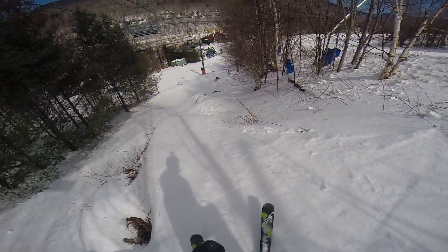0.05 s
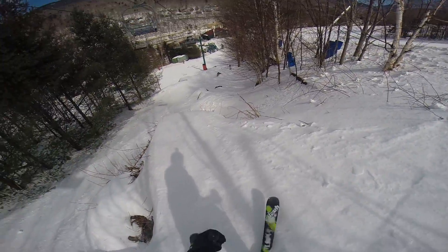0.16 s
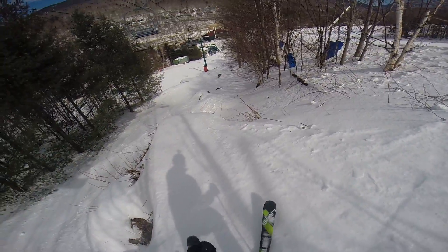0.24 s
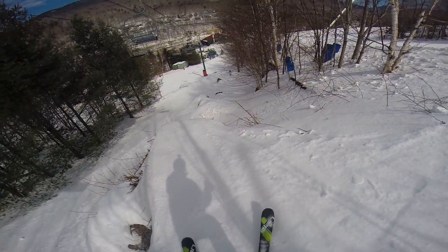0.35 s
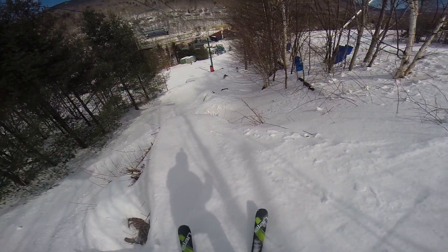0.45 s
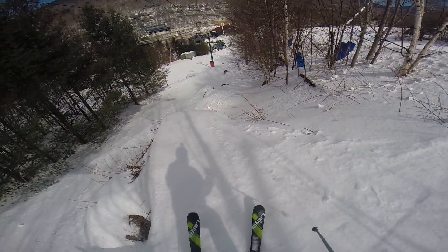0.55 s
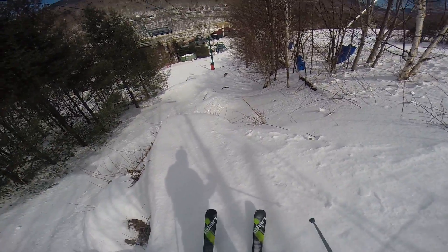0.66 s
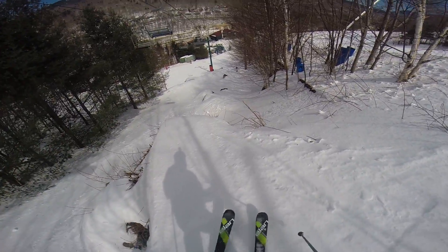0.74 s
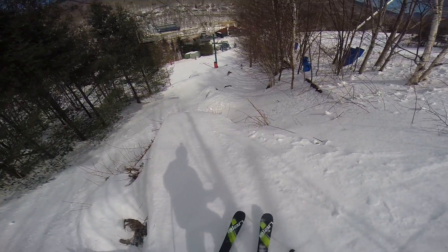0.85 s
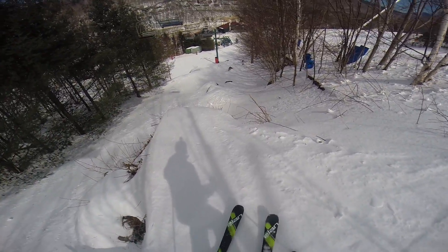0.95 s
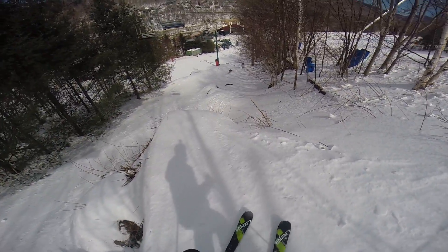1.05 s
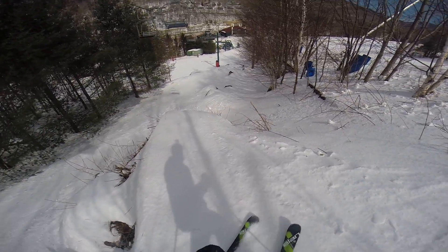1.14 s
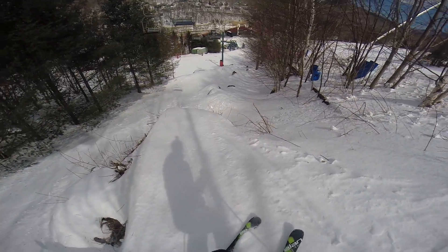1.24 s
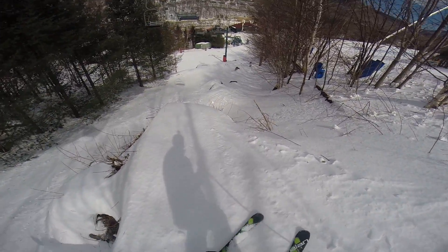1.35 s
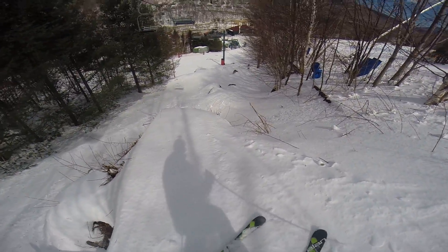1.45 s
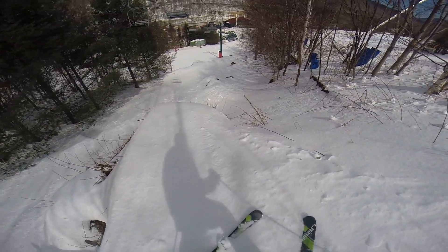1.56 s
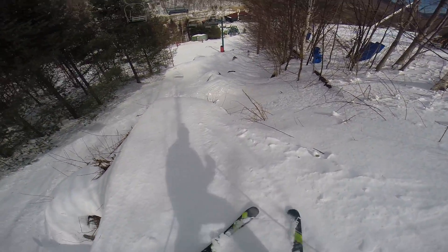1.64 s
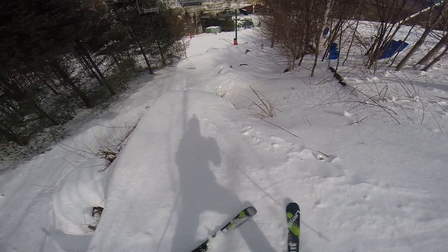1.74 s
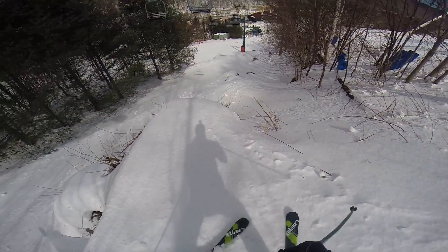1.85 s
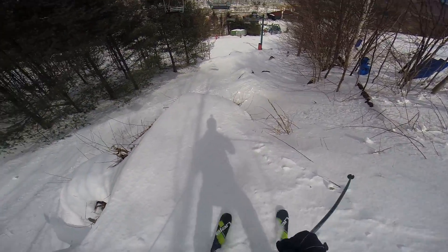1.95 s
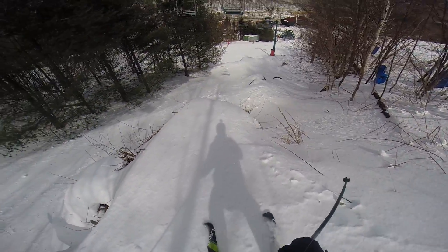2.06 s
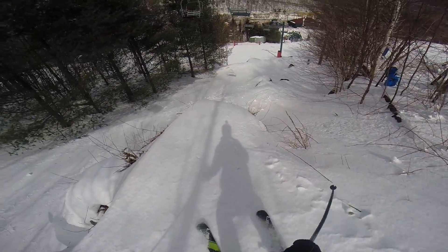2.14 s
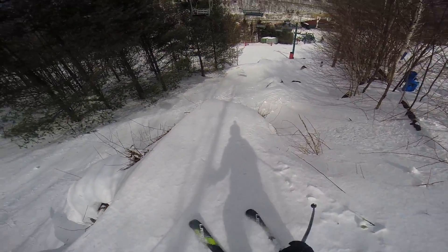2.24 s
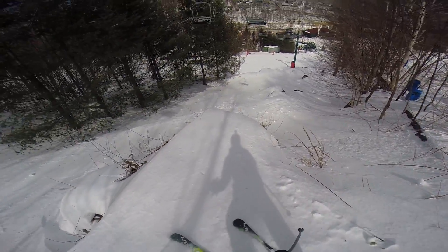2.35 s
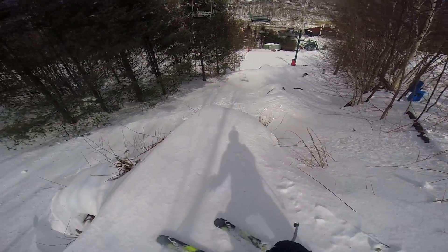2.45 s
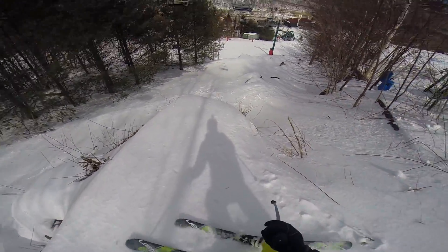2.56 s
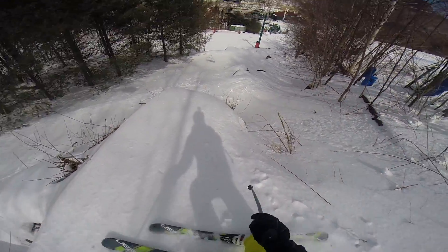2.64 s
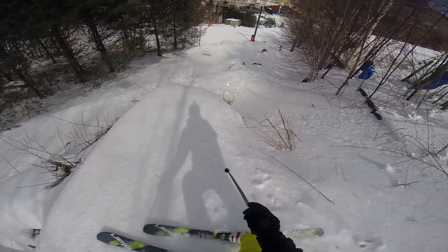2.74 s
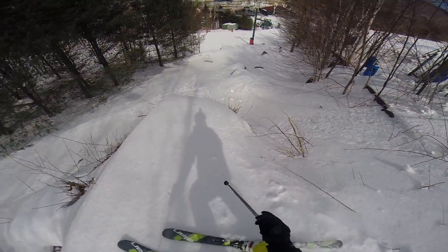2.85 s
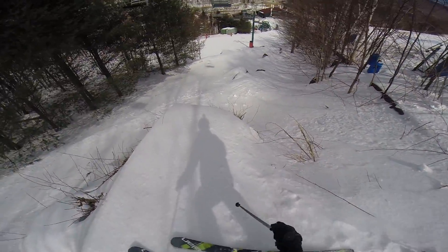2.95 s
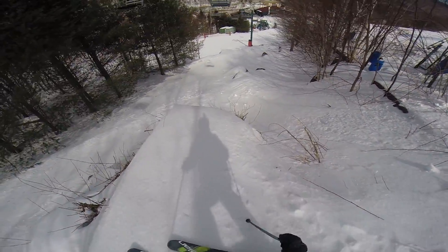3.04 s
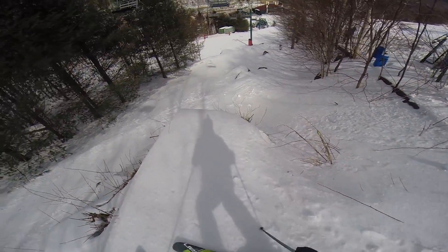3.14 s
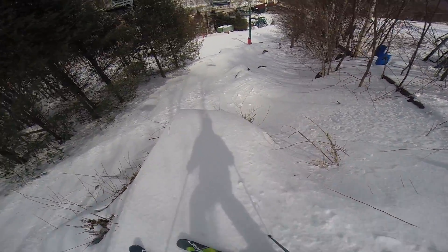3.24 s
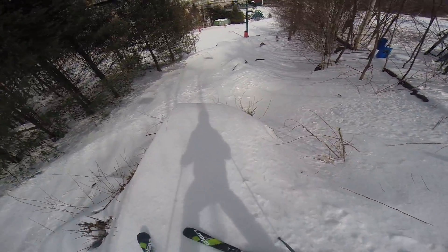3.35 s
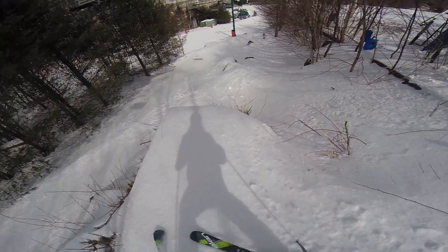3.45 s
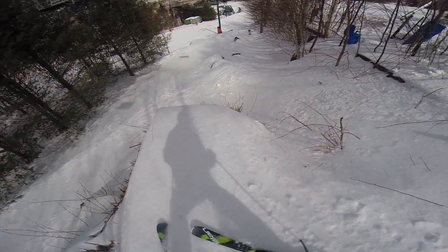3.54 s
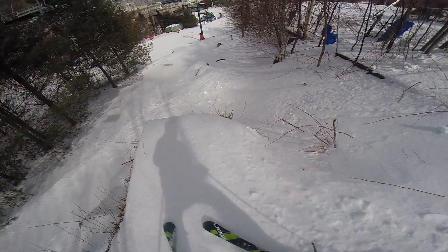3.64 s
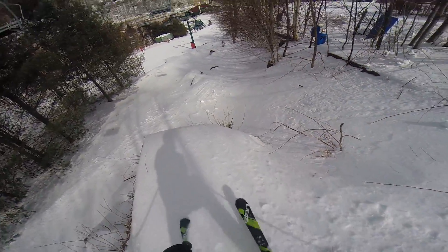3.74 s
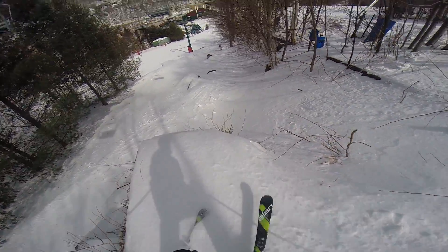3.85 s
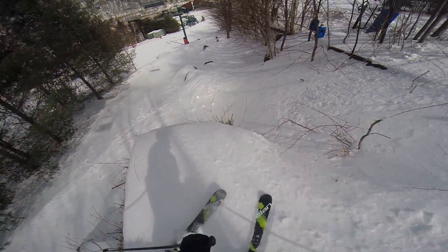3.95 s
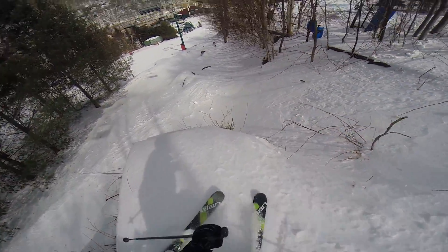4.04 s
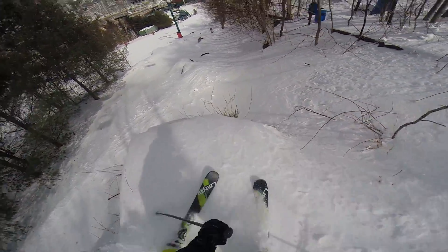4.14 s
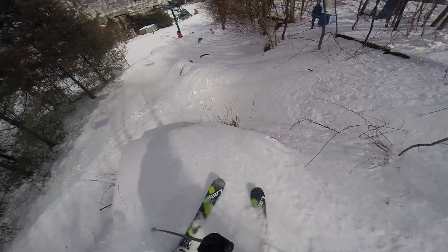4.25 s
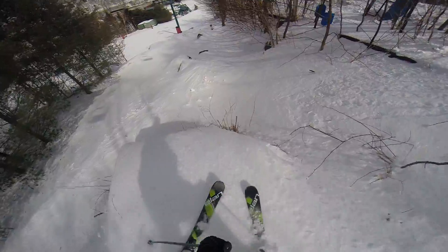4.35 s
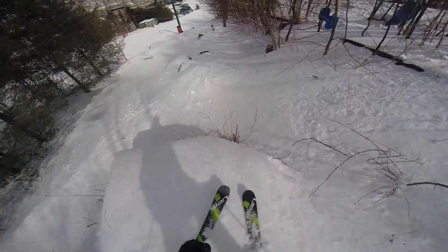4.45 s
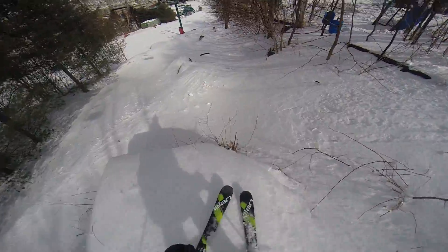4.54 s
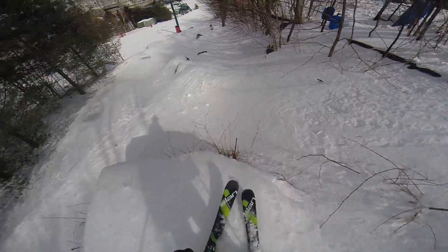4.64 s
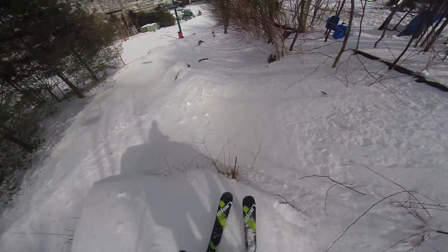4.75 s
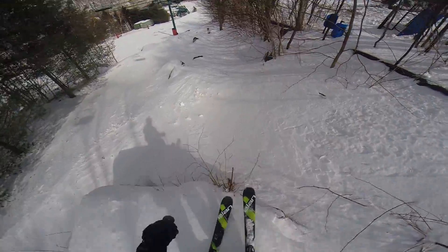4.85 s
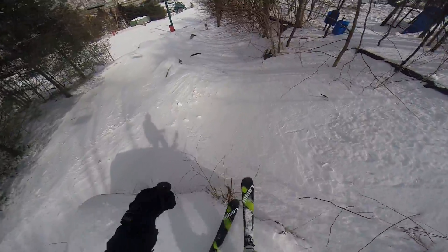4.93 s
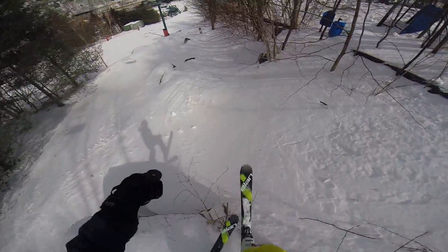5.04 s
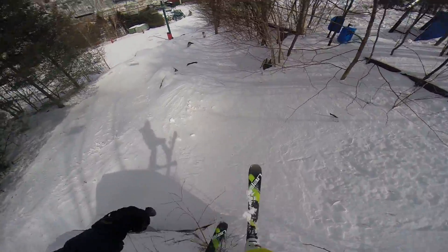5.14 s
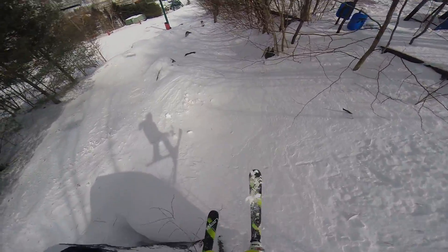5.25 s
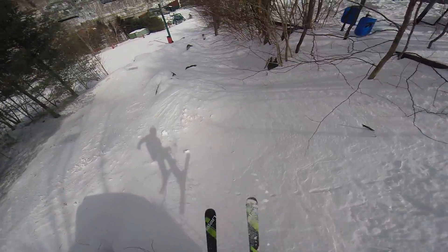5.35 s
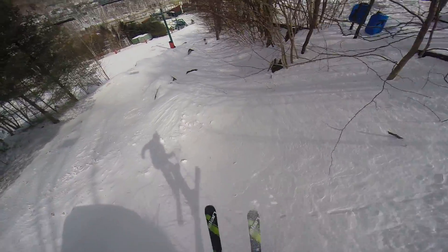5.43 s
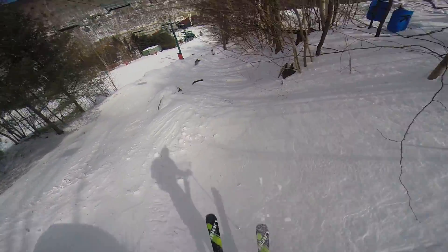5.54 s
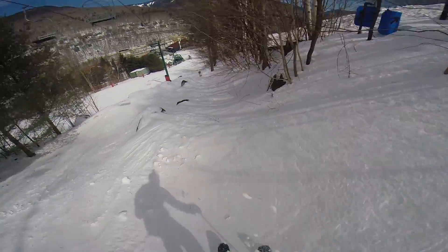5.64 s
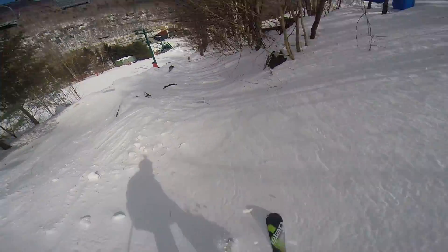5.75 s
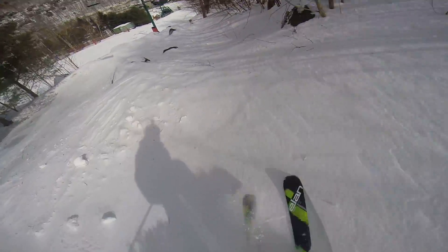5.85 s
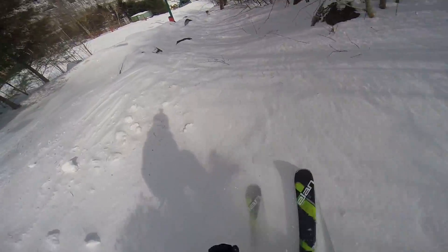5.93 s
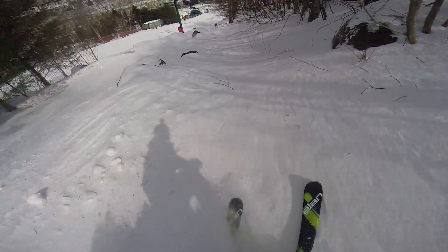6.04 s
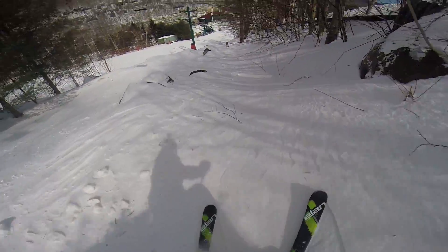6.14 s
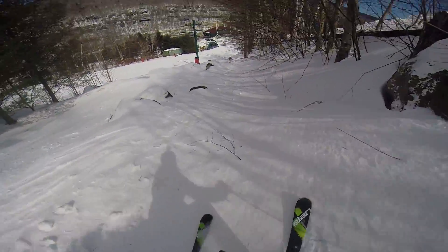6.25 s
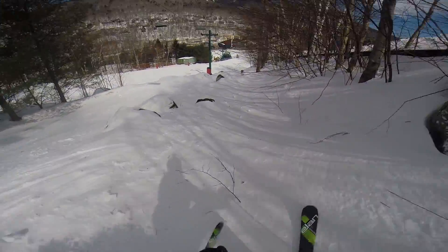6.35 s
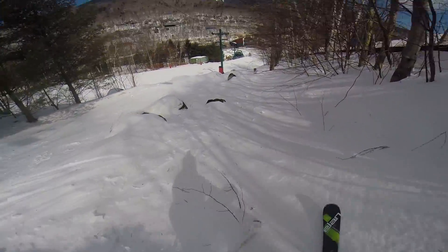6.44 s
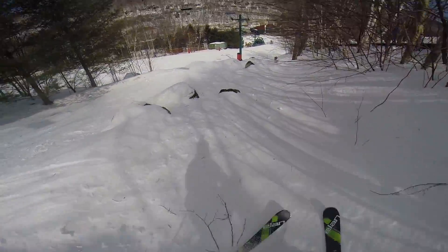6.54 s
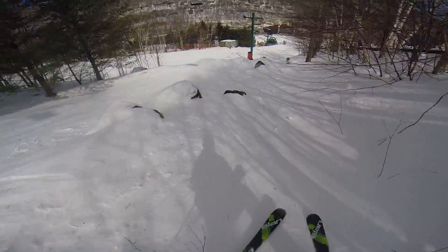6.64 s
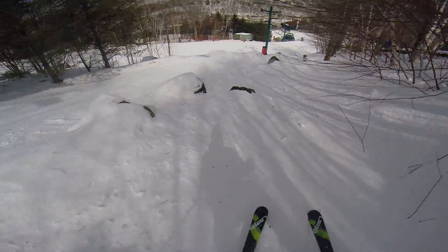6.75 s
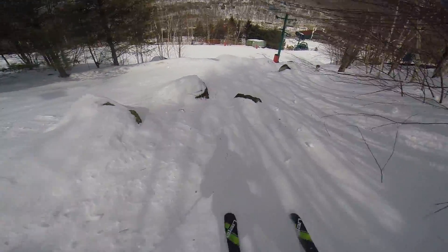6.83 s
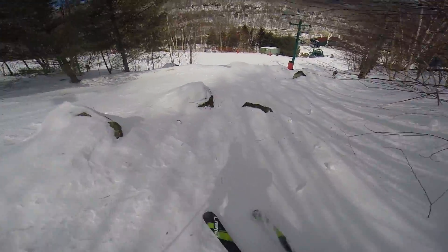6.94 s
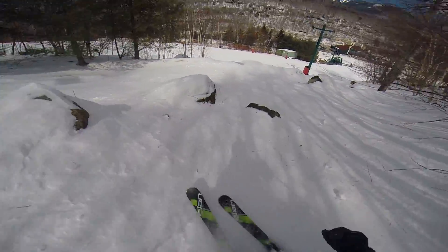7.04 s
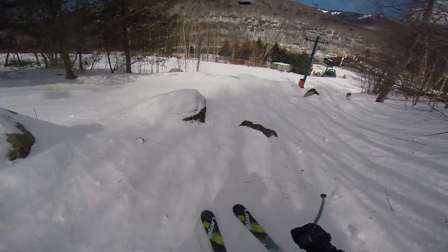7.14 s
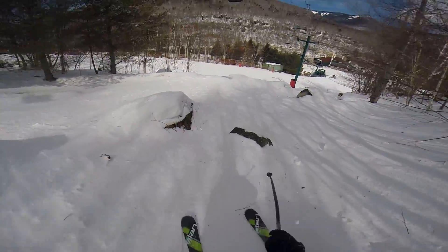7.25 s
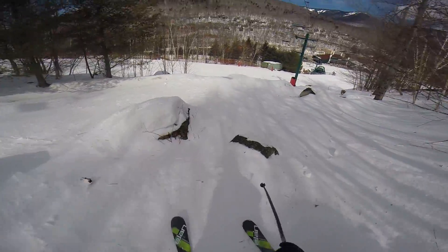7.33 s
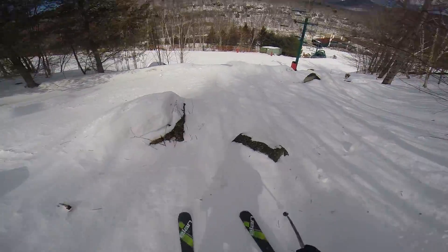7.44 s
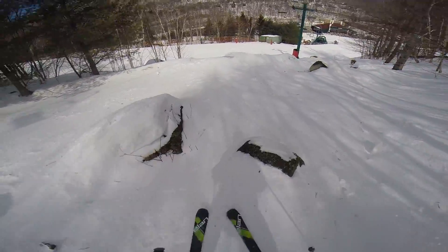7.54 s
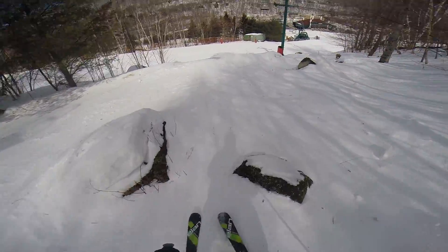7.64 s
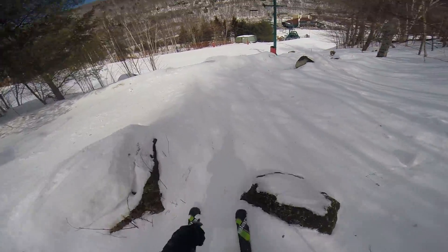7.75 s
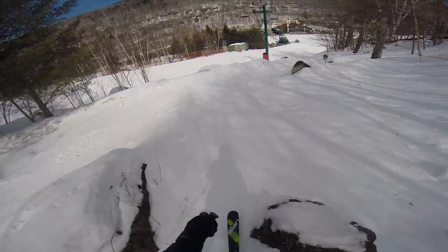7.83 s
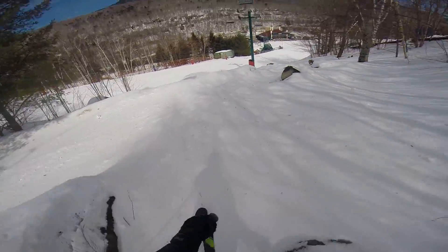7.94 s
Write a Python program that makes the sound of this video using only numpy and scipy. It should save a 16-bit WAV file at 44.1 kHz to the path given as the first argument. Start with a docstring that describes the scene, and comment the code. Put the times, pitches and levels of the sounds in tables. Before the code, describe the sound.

Skis hiss and scrape over bumpy snow while a helmet camera's case knocks with each jolt, over low wind rumble.

```python
"""A closed camera case knocks on its helmet mount as a skier rides down a bumpy slope.
Each jolt rings the mount (thump) and the case wall (click). Snow grains hiss under the skis, heard
through the case's resonances. Clothing or gear rustle, hiss and icy spray swell in sudden surges.
Twigs, poles and bindings tick. Gusts rumble on the case over faint microphone noise."""
import sys
import numpy as np
from scipy import signal
from scipy.io import wavfile
from scipy.ndimage import uniform_filter1d

SR = 44100
rng = np.random.default_rng(int(sys.argv[2]) if len(sys.argv) > 2 else 0)


def dump_mix(stems):
    """Bounce the given channels to the path in sys.argv[1] as a 16-bit WAV at rate SR."""
    frames = np.atleast_2d(stems).T  # one column per channel
    limited = np.clip(frames, -1, 1)  # hard clip at full scale
    pcm = np.round(limited * 32767).astype(np.int16)
    wavfile.write(sys.argv[1], SR, pcm)


N = 352359

# sliding between surges: (time [s], hiss [dB], scrape [dB])
SLIDE_LEVELS = [(0.0, -58.5, -59.5), (0.62, -64, -65), (0.9, -53, -69), (1.2, -52, -55.5),
                (1.75, -50.5, -49), (2.0, -47.5, -61.5), (2.34, -44, -42.5), (2.58, -36, -50),
                (2.96, -46.5, -65), (3.3, -44.5, -64), (3.58, -42.5, -43.5), (3.92, -42.5, -54),
                (4.1, -40, -46), (4.55, -50, -53), (5.08, -50, -58), (5.3, -61, -59), (5.55, -59, -46),
                (5.9, -47.5, -36.5), (6.25, -50.5, -50), (6.45, -40, -41), (6.86, -51, -50),
                (7.08, -37, -36), (7.33, -48, -51.5), (7.99, -50, -52.5)]
# ride: (time [s], wind [dB], mount shake [dB])
RIDE_LEVELS = [(0.0, -41.5, -93.5), (0.85, -43, -86.5), (1.45, -42.5, -82), (1.78, -38.5, -73.5),
               (2.1, -41.5, -96), (2.4, -39.5, -75), (3.14, -42.5, -84), (3.55, -39, -74),
               (4.22, -34.5, -70.5), (4.42, -45.5, -84), (4.7, -41, -72.5), (5.12, -35.5, -92.5),
               (5.4, -33.5, -69), (5.76, -28, -59), (6.65, -37.5, -76.5), (7.19, -29.5, -69),
               (7.48, -41.5, -74.5), (7.99, -36.5, -71)]
# sudden swells: (start [s], end [s], clothing or gear rustle [dB], snow hiss [dB], icy spray [dB])
SURGES = [(0.092, 0.149, -58, -52, -78), (0.305, 0.413, -66, -46.5, -68), (0.422, 0.602, -45.5, -62, -81),
          (1.151, 1.249, -52, -45.5, -67), (2.546, 2.628, -44, -36.5, -68), (4.037, 4.282, -64, -41, -59.5),
          (4.72, 4.766, -47, -48, -70), (5.246, 5.255, -58.5, -52, -45.5), (5.394, 5.469, -50, -56, -72),
          (5.478, 5.619, -34, -46, -60.5), (5.686, 5.734, -35.5, -45.5, -56), (5.763, 5.812, -34, -55, -61),
          (5.885, 6.178, -37.5, -61, -66), (6.293, 6.399, -46.5, -40, -57),
          (6.438, 6.476, -40, -34.5, -48.5), (6.489, 6.575, -35, -38, -48), (6.946, 7.233, -44, -43, -62.5),
          (7.372, 7.502, -44, -47.5, -63.5), (7.67, 7.714, -33.5, -31.5, -62),
          (7.848, 7.912, -46, -32, -53)]
# twig, pole and binding snaps: (time [s], gear drive [dB], case drive [dB])
SNAPS = [(0.2303, -36, -26), (0.3486, -39, -44.5), (0.9062, -40, -39.5), (1.4154, -42, -47),
         (1.622, -33, -34), (1.6557, -35.5, -33.5), (1.925, -37.5, -32.5), (1.956, -41, -37),
         (2.115, -38, -34.5), (2.2235, -39.5, -36), (2.394, -39, -27.5), (3.1372, -38.5, -32.5),
         (3.906, -40, -31.5), (3.975, -48, -37), (4.233, -34, -49), (4.418, -44, -29.5),
         (4.535, -40.5, -37.5), (4.689, -48, -33.5), (4.89, -40.5, -42), (5.1609, -41, -37),
         (5.2458, -34, -28.5), (5.2524, -58, -58), (5.2734, -46.5, -47), (5.6867, -34, -27.5),
         (5.7724, -30.5, -24), (5.895, -37, -32.5), (6.2893, -33.5, -33.5), (6.3597, -32, -28),
         (6.6093, -34.5, -44.5), (6.9456, -36.5, -43), (6.9815, -32.5, -31), (7.0352, -29.5, -23),
         (7.1167, -35.5, -25), (7.5801, -33, -30.5), (7.6241, -35.5, -33), (7.6515, -30.5, -23),
         (7.676, -48.5, -24), (7.8414, -34, -40), (7.8923, -27.5, -17)]
# case knocks: (time [s], thump drive [dB], click drive [dB])
CASE_KNOCKS = [(0.881, -43.5, -47), (1.063, -24.5, -36.5), (1.348, -57, -43), (1.366, -41, -54),
               (1.518, -47.5, -49), (1.725, -9.5, -10.5), (1.818, -19.5, -30.5), (1.898, -39, -55),
               (2.27, -11, -15), (2.334, -12.5, -20), (2.675, -6.5, -9.5), (2.991, -33.5, -57),
               (3.398, -21.5, -30.5), (3.741, -13, -18.5), (4.036, -8, -11.5), (4.206, -8.5, -10),
               (4.366, -18.5, -23), (4.672, -13, -16.5), (5.155, -22, -42), (5.169, -13, -38),
               (5.287, -6.5, -8), (5.402, -35, -40), (5.481, -18, -28), (5.517, -26, -21.5),
               (5.541, -13, -18.5), (5.596, -21.5, -30.5), (5.714, -28.5, -45.5), (5.745, -29, -35),
               (5.784, -18, -27), (5.819, -4, -7), (5.91, -39, -29.5), (6.0, -33.5, -36), (6.103, -29, -31),
               (6.152, -32.5, -38), (6.181, -28.5, -33.5), (6.283, -32, -50.5), (6.735, -32, -33.5),
               (6.785, -4.5, -9.5), (7.08, -14, -18.5), (7.2, -24, -36), (7.274, -6.5, -9.5),
               (7.291, -28, -23.5), (7.684, -7, -15), (7.855, -8.5, -13)]
# air paths through the case: (centre [Hz], width [Hz], gain [dB])
CASE_BANDS = [(1700, 208, 1.5), (2590.4, 264, 0.5), (3865, 270, -8), (4544, 730, -4.5), (6085, 350, -22)]
# fine spray: (centre [Hz], width [Hz], gain [dB])
SPRAY_BANDS = [(8230, 1540, 8.5), (8800, 14750, -0.5), (10300, 1040, -2), (12900, 420, -5)]
# icy spray: (centre [Hz], width [Hz], gain [dB])
ICE_BANDS = [(7500, 4400, 2.5), (10100, 1300, 2.5), (13600, 610, -4)]
# scraping clothing or gear: (centre [Hz], width [Hz], gain [dB])
SCRAPE_BANDS = [(804, 483, -16), (1902, 243, 4.5), (2206.6, 289, 5), (2498, 462, 0.5), (3650, 280, -14.5),
                (5400, 220, -21), (6200, 310, -18), (7620, 300, -24)]
# mount and helmet: (frequency [Hz], gain [dB], t60 [s])
MOUNT_MODES = [(53.3, 6.5, 0.012), (140.5, 2.5, 0.1), (252.06, -26, 0.31), (399, -2.5, 0.01457),
               (721, -12.5, 0.04), (954, -14.5, 0.0758)]
# case wall: (frequency [Hz], gain [dB], t60 [s])
WALL_MODES = [(1465, -1.5, 0.0137), (1786, 8.5, 0.016), (2176, 4.5, 0.0213), (2572, 6.5, 0.0173),
              (2914, 0, 0.025)]
# tapped ski or pole: (frequency [Hz], gain [dB], t60 [s])
GEAR_MODES = [(3826, -17, 0.0081), (4582, -20, 0.027), (5620, -23, 0.0143), (7380, -17, 0.0016),
              (10550, -25.5, 0.0025), (13300, -34.5, .004)]
# case under a light tap: (frequency [Hz], gain [dB], t60 [s])
CASE_TAP_MODES = [(1726, -18, 0.023), (2200, -23, 0.015), (2628, -18.5, 0.0297)]

SPRAY_DB, BUFFET_DB, RATTLE_DB = -16.5, -16, -6  # re hiss, rumble, click drive
SURGE_EASE_DB, SURGE_RAMP_S = -2, 0.005
THUMP_LAG_S, CLICK_LAG_S = 0.00072, 0.000984  # after first touch
FLOOR_DB, TOP_HZ = -62, 15200


def undb(db):
    return 10 ** (np.asarray(db) / 20)


def unit_rms(x):
    return x / np.sqrt(np.mean(x ** 2))


def butter(x, order, hz, kind="low"):
    return signal.sosfilt(signal.butter(order, hz, kind, fs=SR, output="sos"), x)


def curves(table):
    times_s, *columns = np.transpose(table)
    return [np.interp(np.arange(N) / SR, times_s, column) for column in columns]


def ring(x, hz, t60_s):
    """One mode: an impulse starts a decaying sine."""
    r = np.exp(-np.log(1000) / (t60_s * SR))
    w = 2 * np.pi * hz / SR
    return signal.lfilter([0, r * np.sin(w)], [1, -2 * r * np.cos(w), r * r], x)


def modes(x, table):
    """Mode bank, neighbours in opposite phase."""
    return sum((-1) ** k * undb(db) * ring(x, hz, t60_s) for k, (hz, db, t60_s) in enumerate(table))


def resonate(x, bands):
    """Steep resonances in parallel."""
    out = 0
    for hz, width_hz, db in bands:
        b, a = signal.iirpeak(hz, hz / (1.48 * width_hz), SR)
        out = out + undb(db) * signal.lfilter(b, a, signal.lfilter(b, a, x))
    return out


def wander(rate_hz):
    """Random steps, smoothed twice; spread near 1."""
    hold = int(SR / rate_hz)
    steps = np.repeat(rng.standard_normal(N // hold + 1), hold)
    return 1.64 * uniform_filter1d(uniform_filter1d(steps, hold), hold)[:N]


def grit(rate_hz, spread_db):
    """Scattered clicks, most small, a few large."""
    size = undb(spread_db * rng.exponential(size=N)) * rng.standard_normal(N)
    return unit_rms(size * (rng.random(N) < rate_hz / SR))


def flicker(bands, depth_db):
    """Separate grains and level drift per band."""
    return unit_rms(sum(resonate(grit(6000, 0.55), [band]) * undb(depth_db * wander(35))
                        for band in bands))


def impulses(times_s, db):
    x = np.zeros(N)
    x[(times_s * SR).astype(int)] = undb(db)
    return x


def contact(x, contact_ms):
    """Longer contact, duller blow."""
    pulse = np.hanning(int(contact_ms * SR / 1000) + 3)
    return np.convolve(x, pulse / pulse.sum())[:N]


def burst(times_s, db, decay_ms):
    """Exponentially fading bursts of grit."""
    envelope = signal.lfilter([1], [1, -np.exp(-1000 / (decay_ms * SR))], impulses(times_s, db))
    return envelope * grit(7000, 0.97)


def strike(times_s, db, table, contact_ms, vary_db):
    """Blows on a mode bank; drive varies per blow and mode."""
    offset_db = vary_db * rng.standard_normal((len(times_s), len(table)))
    out = 0
    for k, (hz, gain_db, t60_s) in enumerate(table):
        force = contact(impulses(times_s, db + offset_db[:, k]), contact_ms)
        out = out + (-1) ** k * undb(gain_db) * ring(force, hz, t60_s)
    return out


def snow(hiss_db, hiss_surge, ice_surge):
    """Crystals break under the skis: hiss through the case, spray above it."""
    bumps = undb(wander(30) + 0.71 * wander(6))
    hiss = flicker(CASE_BANDS, depth_db=1.95) * np.hypot(undb(hiss_db), hiss_surge)
    spray = flicker(SPRAY_BANDS, depth_db=2.0) * undb(hiss_db + SPRAY_DB)
    ice = flicker(ICE_BANDS, depth_db=2.7) * ice_surge
    return bumps * (hiss + spray + ice)


def scrape(db, surge):
    """Clothing or gear rubs close by: uneven grit through resonances."""
    rub = unit_rms(resonate(grit(4000, 0.51), SCRAPE_BANDS))
    return rub * undb(2.5 * wander(45)) * np.hypot(undb(db), surge)


def mount_shake(db):
    """The ride keeps the mount ringing faintly."""
    return modes(contact(grit(150, 1.54) * undb(db), contact_ms=1.18), MOUNT_MODES)


def wind(db):
    """Gust pressure on the case: deep rumble, weaker buffeting above."""
    rumble = unit_rms(butter(rng.standard_normal(N), 2, [3, 15], "band"))
    buffet = butter(grit(700, 0.94), 1, [20, 60], "band")
    buffet = unit_rms(butter(buffet, 1, 450))
    return rumble * undb(db + 1.7 * wander(8.2)) + buffet * undb(db + 2.72 * wander(9.1) + BUFFET_DB)


def mic_noise():
    """Dull, steady noise floor."""
    return unit_rms(butter(rng.standard_normal(N), 1, 1500)) * undb(FLOOR_DB)


def surges():
    """Scrape, hiss and ice gains: sudden start, slight easing, sudden stop."""
    gains = np.zeros((3, N))
    for start_s, end_s, *levels_db in SURGES:
        start, end = int(start_s * SR), int(end_s * SR)
        ease_db = SURGE_EASE_DB * np.linspace(0, 1, end - start) ** 2
        gains[:, start:end] = undb(np.array(levels_db)[:, None] + ease_db)
    return uniform_filter1d(gains, int(SURGE_RAMP_S * SR))


def ticks():
    """Snaps ring gear and case; too light to carry bass."""
    times_s, gear_db, case_db = np.transpose(SNAPS)
    gear = modes(burst(times_s, gear_db, decay_ms=4.3), GEAR_MODES)
    case_force = contact(burst(times_s, case_db, decay_ms=6.2), contact_ms=0.21)
    return butter(gear + modes(case_force, CASE_TAP_MODES), 2, 1300, "high")


def knocks():
    """Each jolt thumps the mount, clicks the case wall and rattles the gear."""
    times_s, thump_db, click_db = np.transpose(CASE_KNOCKS)
    click_s = times_s + CLICK_LAG_S
    thump = strike(times_s + THUMP_LAG_S, thump_db, MOUNT_MODES, contact_ms=1.368, vary_db=2.2)
    click = strike(click_s, click_db, WALL_MODES, contact_ms=0.46, vary_db=1.9)
    rattle = strike(click_s, click_db + RATTLE_DB, GEAR_MODES[:3], contact_ms=0.1, vary_db=4.4)
    return thump + rattle + butter(click, 4, 3600)  # closed case dulls the click


def scene():
    """Mono mix."""
    hiss_db, scrape_db = curves(SLIDE_LEVELS)
    wind_db, shake_db = curves(RIDE_LEVELS)
    scrape_surge, hiss_surge, ice_surge = surges()
    sliding = snow(hiss_db, hiss_surge, ice_surge) + scrape(scrape_db, scrape_surge)
    return (sliding + mount_shake(shake_db) + knocks() + ticks() + wind(wind_db) + mic_noise())[None]


def record(dry):
    """Soft clip, then steep low-pass."""
    rounded = dry / (1 + np.abs(dry / 1.05) ** 5) ** (1 / 5)
    return signal.sosfilt(signal.ellip(10, .2, 80, TOP_HZ, fs=SR, output="sos"), rounded)


dry = scene()
out = record(dry)
dump_mix(out)
```